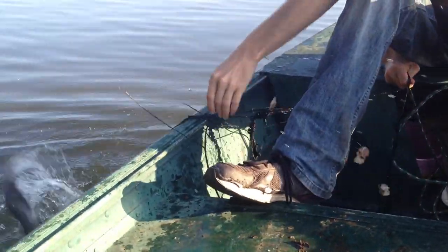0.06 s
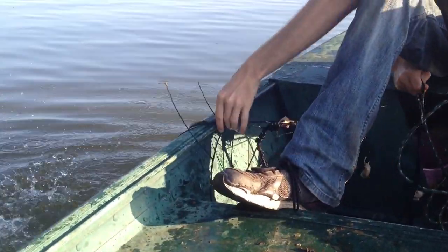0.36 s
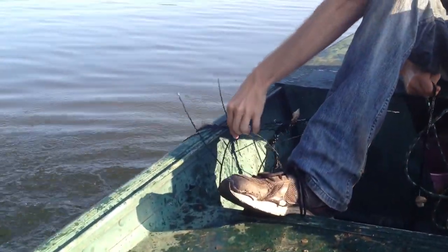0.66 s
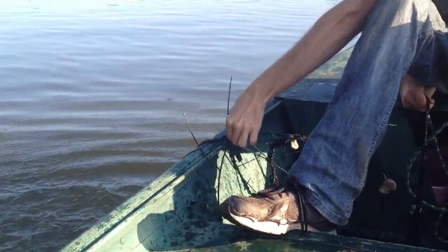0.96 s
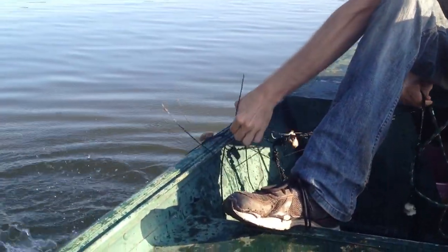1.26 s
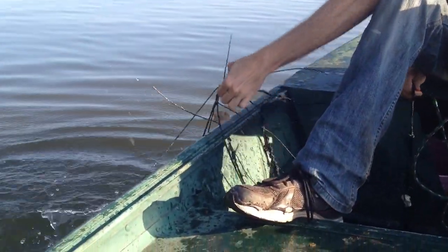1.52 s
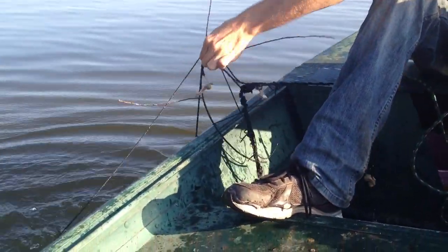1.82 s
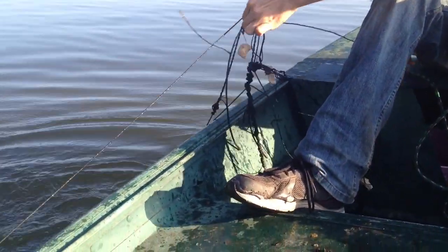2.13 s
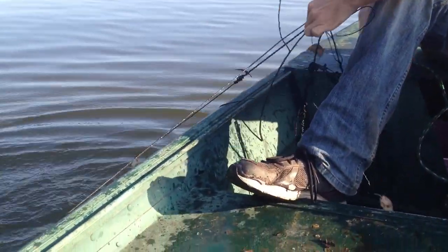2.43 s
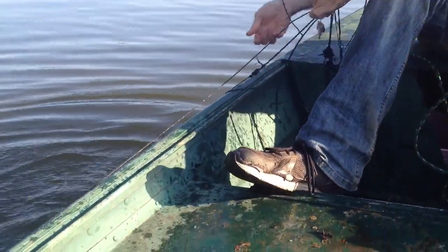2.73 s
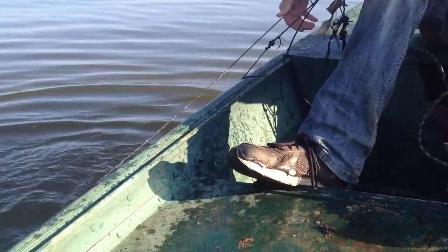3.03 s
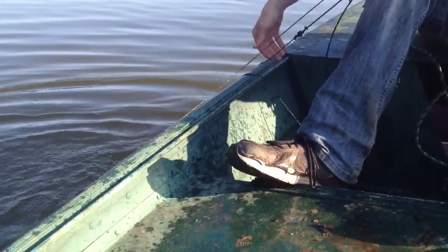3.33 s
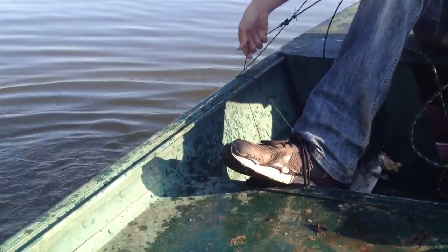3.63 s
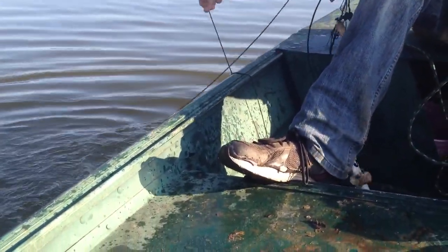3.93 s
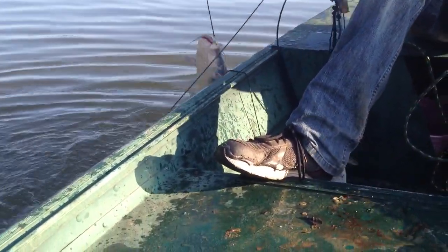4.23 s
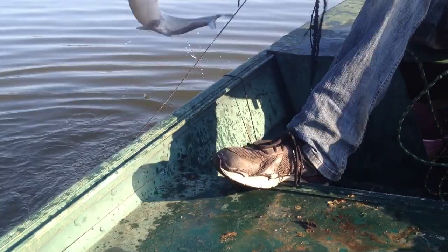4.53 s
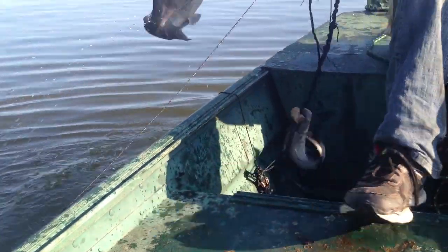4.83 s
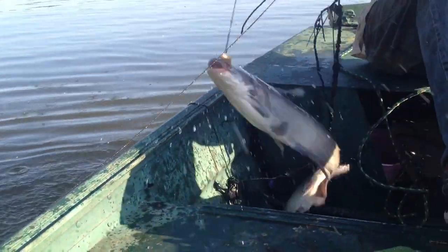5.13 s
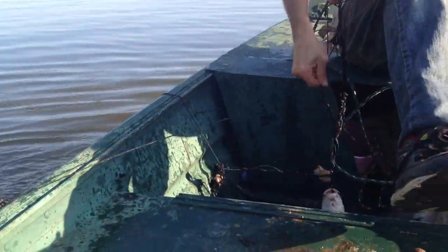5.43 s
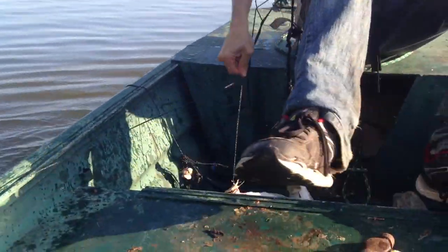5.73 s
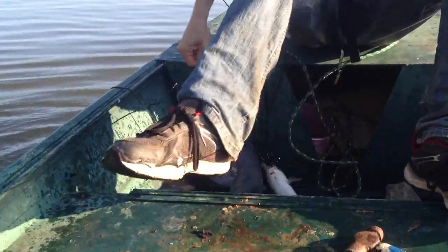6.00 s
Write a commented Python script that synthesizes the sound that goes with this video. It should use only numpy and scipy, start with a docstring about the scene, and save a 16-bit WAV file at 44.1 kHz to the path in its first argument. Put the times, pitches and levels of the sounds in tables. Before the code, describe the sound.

Light splashing and small ticks of fishing line, followed by wet fish knocking and flapping loudly on a metal boat floor.

```python
"""Catfish hauled into a metal boat

Fish on a hand line splash alongside, and the air they trap rings as bubbles. Wavelets drum on the hull,
line and tackle tick and slide on the gunwale, and something chirps far off. Aboard, the wet fish
slither and squeak by stick-slip friction, thump the floor plates into their damped modes
and land one sharp tail slap on the side wall."""
import sys
import numpy as np
from scipy import signal
from scipy.fft import rfft, irfft, next_fast_len
from scipy.io import wavfile
from scipy.ndimage import uniform_filter1d, map_coordinates

SR = 44100
rng = np.random.default_rng(int(sys.argv[2]) if len(sys.argv) > 2 else 0)


def transcribe(signal):
    """Save signal, clipped to [-1, 1], as a 16-bit WAV file at the path in sys.argv[1]."""
    frames = np.atleast_2d(signal).T
    limited = np.clip(frames, -1, 1)
    pcm = np.round(limited * 32767).astype(np.int16)
    wavfile.write(sys.argv[1], SR, pcm)


N = 276066
T = np.arange(N) / SR
LEAD_S, TOP_HZ = 0.1, 15800
AGE = np.arange(SR // 2) / SR - LEAD_S  # time around one event, s
ELAPSED = np.maximum(AGE, 0)


def amp(db):
    """Decibels to amplitude ratio."""
    return 10 ** (np.asarray(db) / 20)


def unit(x):
    """Normalisation to rms 1."""
    return x / np.sqrt(np.mean(x ** 2) + 1e-20)


def crest(x, size):
    """Normalisation of the loudest stretch of size samples to rms 1."""
    return x / np.sqrt(uniform_filter1d(x * x, size).max() + 1e-20)


def fade(t, t60):
    """Exponential decay from t = 0, silent before."""
    return (t >= 0) * np.exp(-np.log(1000) * np.abs(t) / t60)


def swell(rise, t60):
    """An envelope that builds up to time 0, then decays exponentially."""
    return np.where(AGE < 0, np.exp(-np.abs(AGE / (1.3 * rise)) ** 1.5), fade(AGE, t60))


def glide(hz):
    """A sine whose phase is the integral of a changing frequency."""
    return np.sin(2 * np.pi * np.cumsum(hz) / SR)


def colour(x, points):
    """Minimum-phase filter through (frequency_hz, gain_db) points."""
    size = 2 * next_fast_len(len(x) // 2 + 4096)
    hz, db = np.transpose(points)
    gain = amp(np.interp(np.log(np.fft.rfftfreq(size, 1 / SR) + 1), np.log(hz), db))
    cepstrum = irfft(np.log(gain))
    cepstrum[1:size // 2] *= 2
    cepstrum[size // 2 + 1:] = 0
    return irfft(rfft(x, size) * np.exp(rfft(cepstrum)))[:len(x)]


def resonate(x, hz, width_hz):
    """A second-order resonance with gain 1 at its centre."""
    return signal.lfilter(*signal.iirpeak(hz, hz / width_hz, fs=SR), x)


def wobble(rate_hz):
    """Smooth random modulation, interpolated between rate_hz knots a second."""
    return map_coordinates(rng.standard_normal(int(N * rate_hz / SR) + 4), [T * rate_hz])


def grit(spread_db, size):
    """Random amplitude modulation clumps one event's noise into grains of size samples."""
    clumps = unit(uniform_filter1d(rng.standard_normal(len(AGE)), size))
    return rng.standard_normal(len(AGE)) * amp(spread_db * clumps)


def add(track, start_s, sound):
    """Superposition of one event, its time 0 placed at start_s."""
    start = round((start_s - LEAD_S) * SR)
    part = sound[max(-start, 0):max(N - start, 0)]
    track[max(start, 0):][:len(part)] += part


# Lapping heard through the hull: frequency_hz, density_db
LAPPING_SPECTRUM = [(15, -79), (25, -53), (80, -20.5), (98, -15.5), (135, -13), (162, -3), (235, -11),
                    (283, -7.5), (329, -16), (376, -11), (510, -22.5), (803, -26), (874, -20.5),
                    (1140, -30), (1400, -57), (1820, -50), (3080, -120)]


def lapping(level_db=-43.5, fall_db_per_s=0.17):
    """Forced vibration: slowly calming wavelets keep the hull droning."""
    drumming = unit(colour(rng.standard_normal(N), LAPPING_SPECTRUM))
    hum = resonate(rng.standard_normal(N), 164, width_hz=22)
    hum = unit(resonate(hum, 179, width_hz=102))
    return amp(level_db - fall_db_per_s * T) * unit(drumming + amp(-1.5) * hum)


# Thin background hiss: frequency_hz, density_db
HISS_SPECTRUM = [(500, -43), (1300, 0.5), (2200, -6), (3700, -3), (4020, 0.5), (4300, -11.5), (6100, -7.5),
                 (7300, 3), (8000, -6.5), (8800, -24.5), (11000, -18.5), (15000, -11), (15700, -16)]


def hiss():
    """Stationary filtered noise lies faintly under everything."""
    return amp(-60) * unit(colour(rng.standard_normal(N), HISS_SPECTRUM))


def fizz(hz, log_spread, cycles, spread_db, count, size):
    """A bubble cloud: count randomly timed damped sines of size samples, each rising a little."""
    when, pitch, strength = rng.random((count, 3)).T[:, :, None]
    turns = hz * np.exp(log_spread * (2 * pitch - 1)) * np.arange(size) / SR
    lives = turns / cycles
    climb = 1 + 0.017 * np.minimum(lives, 2)
    gain = amp(-spread_db * np.log(strength + 0.0075))
    grains = gain * np.sin(2 * np.pi * turns * climb) * np.exp(-lives)
    positions = (when * N).astype(int) + np.arange(size)
    return unit(np.bincount(positions.ravel(), grains.ravel(), N)[:N])


# Filters for churned water and for flying droplets: frequency_hz, gain_db
SLOSH_FILTER = [(150, -44), (300, 6.5), (550, -2.5), (820, 8.5), (1100, 5.5), (1300, -4.5), (2200, -15)]
SPRAY_FILTER = [(800, -8.5), (1400, 2), (2200, -5.5), (3300, 1), (4500, -1), (6200, 1.5), (7600, -6),
                (9200, -16), (13000, -18), (15500, -29)]
# Tail strokes at the surface: start_s, slosh_db, spray_db, spray_t60_s
TAIL_STROKES = [(.01, -44.5, -41, 0.052), (0.069, -44, -42, 0.14), (.125, -46.5, -44, 0.18),
                (.212, -48, -44.5, 0.27), (.277, -51, -44.5, 0.24), (0.353, -36, -38, 0.26),
                (.44, -46, -47, 0.28), (.548, -49.5, -45.5, 0.047), (0.696, -52, -45, 0.34),
                (.825, -47, -46.5, 0.25), (1.055, -50.5, -52, 0.41), (1.185, -49.5, -50, 0.095),
                (1.235, -52, -58, 0.28), (1.281, -51, -47, 0.57), (1.43, -51, -54, 0.86),
                (1.56, -54.5, -50.5, 0.39), (1.711, -43, -53.5, 0.24), (2.804, -41.5, -52.5, 0.34),
                (2.86, -57, -56, 1), (3.072, -41.5, -53, 0.2), (3.155, -41.5, -49, 0.17),
                (3.221, -45.5, -56, 0.46)]


def splashes(wash_db=-54, wash_hold_s=0.13, wash_fall_db_per_s=8):
    """Incoherent sources add in power: each stroke churns big bubbles and throws spray; ripples trickle."""
    big_bubbles = fizz(775.6, log_spread=0.705, cycles=7.7, spread_db=1.1, count=2500, size=1200)
    slosh = unit(colour(big_bubbles + 0.041 * rng.standard_normal(N), SLOSH_FILTER))
    clumps = amp(2 * wobble(220))  # drops land in clumps
    spatter = unit(clumps * rng.standard_normal(N))
    droplets = fizz(3900, log_spread=0.85, cycles=5, spread_db=2, count=11000, size=256)
    bursts = fizz(4600, log_spread=0.5, cycles=1.2, spread_db=3, count=1100, size=96)
    spray = unit(colour(droplets + spatter + amp(-4) * bursts, SPRAY_FILTER))
    ripples = amp(-63 + 1.5 * wobble(4))
    trickle = ripples * fizz(2900, log_spread=0.45, cycles=6, spread_db=2, count=4000, size=512)
    # the churned patch fizzes on, then settles
    wash = amp(wash_db - wash_fall_db_per_s * np.maximum(T - wash_hold_s, 0))
    slosh_power, spray_power = (0.45 * wash) ** 2, wash ** 2
    for start_s, slosh_db, spray_db, t60 in TAIL_STROKES:
        add(slosh_power, start_s, (amp(slosh_db) * swell(0.021, 1.04 * t60)) ** 2)
        add(spray_power, start_s, (amp(spray_db) * swell(0.028, t60)) ** 2)
    return trickle + np.sqrt(slosh_power) * slosh + np.sqrt(spray_power) * spray


# Modes of the hull plates before a body damps them: pitch_hz, level_db, t60_s
PLATE_MODES = [(96, -38, 0.11), (147.4, 5.5, 0.34), (178, -6.5, 0.28), (239.2, -2.5, 0.43),
               (293.9, 3, 0.26), (338.6, -4, 1), (405.3, 4.5, 0.16), (500.8, -3.5, 0.24), (596, -3, 0.2),
               (732, 3, 0.12), (842.4, 3.5, 0.19), (936, 11, 0.036), (1046, -1, 0.25)]
# Their crowd of weak overtones: frequency_hz, density_db
OVERTONE_SPECTRUM = [(60, -28), (115, 5), (190, 0.5), (450, 2), (1120, -4), (1260, -7), (1800, -3.5),
                     (3000, 5.5), (8000, -100)]


def blow(level_db, rise, drag_t60, cutoff_hz, tap):
    """Contact force convolved with the plates' impulse response; harder contact wakes higher modes."""
    t = AGE[AGE >= 0]
    modes = np.zeros(len(t))
    for hz, mode_db, t60 in PLATE_MODES:
        envelope = amp(mode_db + rng.normal(0, 1)) * fade(t, t60)
        detuned_hz = hz * (1 + 0.0314 * rng.standard_normal())
        modes += envelope * np.sin(2 * np.pi * detuned_hz * t + rng.uniform(0, 2 * np.pi))
    damped = modes * fade(t, 1.0) * (1 - np.exp(-t / 0.00036))  # the wet body mutes the plate
    overtones = rng.standard_normal(len(t)) * (fade(t, 0.03) + amp(-12) * fade(t, 0.16))
    response = unit(damped) + unit(colour(overtones, OVERTONE_SPECTRUM))
    force = grit(2.7, size=128) * swell(rise, drag_t60)
    force *= min(rise + drag_t60 / 7, 0.04) * 70 / np.linalg.norm(force)  # long pushes outweigh the tap
    force[round(LEAD_S * SR)] += tap
    ring = signal.fftconvolve(force, response)[:len(AGE)]
    ring = signal.sosfilt(signal.butter(3, cutoff_hz, fs=SR, output="sos"), ring)
    lowest_hz = np.interp(level_db, [-20, -14], [140, 108])  # only heavy blows move the whole floor
    ring = signal.sosfilt(signal.butter(5, lowest_hz, "high", fs=SR, output="sos"), ring)
    return amp(level_db) * crest(ring, size=800)


# Swell and soft bodies meeting the hull: start_s, level_db, cutoff_hz
SOFT_BUMPS = [(0.079, -36.5, 440), (0.214, -34, 510), (0.634, -31.5, 173), (1.2, -37.5, 586),
              (1.227, -49, 450), (1.898, -35, 135), (2.847, -34.5, 480), (2.972, -38.5, 477),
              (3.271, -38, 139), (5.117, -30.5, 293), (5.49, -37.5, 463), (5.655, -40.5, 457),
              (5.98, -27, 426), (6.128, -24.5, 404), (6.234, -20, 430)]


def bumps():
    """Soft impact acts as a low-pass filter, so the plates answer dully."""
    out = np.zeros(N)
    for start_s, level_db, cutoff_hz in SOFT_BUMPS:
        early_s = 1.274 / cutoff_hz  # start early to offset the low-pass delay
        bump = blow(level_db, rise=0.012, drag_t60=0.069, cutoff_hz=cutoff_hz, tap=0.87)
        add(out, start_s - early_s, bump)
    return out


# Line and tackle striking metal: start_s, level_db, centre_hz, contact_t60_s, top_gain_db
TACKLE_TICKS = [(0.123, -47, 3600, 0.019, -20), (0.157, -40, 4340, 0.014, -20), (0.211, -46, 4800, .025, 0),
                (0.329, -26.5, 5270, 0.014, -14), (0.557, -39, 4070, 0.026, -22),
                (0.814, -36, 3430, 0.021, -14), (1.3543, -26.5, 3690, 0.019, -11),
                (2.496, -46.5, 4640, 0.05, -6), (2.874, -40, 2670, 0.051, -8),
                (3.3645, -34.5, 4150, 0.033, 2), (3.425, -43, 2570, 0.11, -41),
                (3.678, -42.5, 4970, 0.018, -6), (3.6866, -34.5, 6600, 0.0025, -15),
                (3.752, -40, 4030, 0.036, -7), (3.844, -47, 2250, 0.049, -25),
                (3.9216, -32.5, 6100, 0.02, -5), (4.952, -46, 3300, 0.021, 7),
                (5.159, -34.5, 4740, 0.06, -1), (5.379, -40, 3800, 0.028, 4),
                (5.672, -40, 6300, 0.018, -12), (5.728, -38, 4610, 0.036, -8),
                (5.7586, -27.5, 7510, 0.016, -13.5), (5.803, -34, 3250, 0.011, -10),
                (5.8207, -27, 6000, 0.026, -9.5)]
# The rim ringing under the firmer ticks: start_s, level_db
GUNWALE_RINGS = [(3.921, -41.5), (5.16, -42), (5.821, -29)]


def ticks(gunwale_hz=805, gunwale_t60_s=0.18):
    """Brief hard contacts excite high resonances: a snap, a short rattle, at times a ring of the rim."""
    out = np.zeros(N)
    for start_s, level_db, hz, t60, top_db in TACKLE_TICKS:
        snap = np.minimum(1.6 * swell(0.04 * t60, t60), 1)
        rattle = amp(-19) * fade(AGE, 0.075)
        contact = grit(2, size=32) * (snap + rattle)
        ring = resonate(contact, hz, width_hz=0.86 * hz) + 0.99 * resonate(contact, hz, width_hz=420)
        tick = colour(ring, [(300, 25), (1000, 11), (7500, 5), (9500, top_db + 1), (15000, top_db)])
        add(out, start_s, amp(level_db) * crest(tick, size=88))
    rim = fade(AGE, gunwale_t60_s) * np.sin(2 * np.pi * gunwale_hz * AGE)
    for start_s, level_db in GUNWALE_RINGS:
        add(out, start_s, amp(level_db) * rim)
    return out


# Single air bubbles in the water: start_s, level_db, pitch_hz, life_s
AIR_BUBBLES = [(0.192, -40, 3320, .004), (0.3122, -25, 4070, 0.0047), (0.337, -30, 1095, 0.026),
               (.675, -49, 5150, .02), (0.816, -40.5, 887, 0.012), (1.142, -45, 4450, .004),
               (1.521, -47.5, 1610, 0.01), (2.806, -34.5, 797, 0.008), (2.841, -30.5, 327.5, 0.017),
               (3.064, -31, 764, 0.012), (4.934, -17.5, 960, 0.0089)]


def bubbles(climb_per_life=0.101, gulp_at_s=0.96, gulp_db=-27):
    """Bubble resonance: trapped air rings, rising in pitch as it nears the surface; one pocket gulps."""
    out = np.zeros(N)
    for start_s, level_db, hz, life_s in AIR_BUBBLES:
        lives = ELAPSED / life_s
        attack = 1 - np.exp(-ELAPSED * hz)  # builds over about one cycle
        decay = np.exp(-lives ** 5) + 0.3 * fade(ELAPSED, 8 * life_s)
        tone = glide(hz * (1 + climb_per_life * np.minimum(lives, 2)))
        add(out, start_s, amp(level_db) * attack * decay * tone)
    add(out, gulp_at_s, amp(gulp_db) * gulp())
    return colour(out, [(70, -41), (200, -0.5)])


def gulp(from_hz=249.5, to_hz=870, length_s=0.15):
    """Resonance rises as volume falls: an air pocket shrinks ever faster and sings until it closes."""
    progress = ELAPSED / length_s
    pitch_hz = from_hz + (to_hz - from_hz) * progress ** 3
    envelope = (fade(AGE, 0.21) + amp(-13)) * np.exp(-progress ** 20)
    flutter = unit(uniform_filter1d(uniform_filter1d(rng.standard_normal(len(AGE)), 300), 200))
    breakup = amp(-6 * progress + 4.5 * np.minimum(progress, 1) * flutter)
    return glide(pitch_hz * (AGE > 0)) * envelope * breakup


# Short wet knocks on the plates: start_s, level_db, cutoff_hz, skid_db
WET_KNOCKS = [(0.968, -39, 1410, -65), (2.356, -42.5, 1250, -58), (3.423, -39, 1570, -59),
              (3.762, -36.5, 510, -53), (4.17, -44, 1770, -50.5), (5.105, -40.5, 980, -49),
              (5.16, -41.5, 1130, -47.5), (5.378, -35.5, 1480, -40.5), (5.527, -22.5, 1130, -36.5),
              (5.573, -25, 1100, -40), (5.605, -36.5, 1087, -49), (5.727, -35.5, 1300, -46.5),
              (5.759, -37.5, 516, -62), (5.783, -45, 950, -64), (5.902, -30, 1870, -49),
              (6.011, -29.5, 1100, -44.5)]


def knocks(skid_rise_s=0.002):
    """Impact, then friction: a quick blow rings the plates and wet skin skids on over them."""
    out = np.zeros(N)
    for start_s, level_db, cutoff_hz, skid_db in WET_KNOCKS:
        add(out, start_s, blow(level_db, rise=0.00052, drag_t60=0.018, cutoff_hz=cutoff_hz, tap=0.3))
        add(out, start_s + skid_rise_s, skid(skid_db, skid_rise_s, t60=0.25))
    return out


# Rubbing on the boat's surfaces: frequency_hz, density_db
FRICTION_SPECTRUM = [(350, -1), (700, 5.5), (1050, 9.5), (1350, -5), (1800, 3.5), (2900, 4), (4200, 1.5),
                     (6000, -1.5), (7600, -4), (9500, -19), (13000, -25), (15500, -38)]


def skid(level_db, rise, t60):
    """Friction noise: a sliding contact sheds a dense run of tiny slips."""
    slips = grit(2.5, size=60) * swell(rise, t60)
    return amp(level_db) * crest(colour(slips, FRICTION_SPECTRUM), size=500)


# Line, soles and wet skin sliding: start_s, level_db, rise_s, t60_s
SLIDING_CONTACTS = [(1.173, -41, 0.0039, 0.078), (1.823, -39.5, 0.014, 0.17), (1.875, -41.5, 0.0031, 0.082),
                    (2.354, -56, 0.0037, 0.051), (3.372, -41, 0.0051, 0.092), (3.928, -37.5, 0.0058, 0.061),
                    (4.046, -51.5, .01, 0.24), (4.785, -51, 0.037, 0.72), (4.87, -56, .03, 0.35),
                    (4.938, -43, 0.014, 0.11), (5.16, -48.5, 0.022, .1), (5.273, -48, 0.0082, 0.21),
                    (5.38, -37.5, 0.0081, 0.09), (5.518, -34, 0.0084, 0.16), (5.599, -32.5, 0.0043, .1),
                    (5.616, -34, 0.01, 0.13), (5.675, -40.5, 0.0018, 0.14), (5.69, -47, .003, 0.14),
                    (6.071, -34, 0.02, 0.37)]


def slides():
    """Sliding friction: the line runs over the gunwale, and soles and skin shift on the paint."""
    out = np.zeros(N)
    for start_s, level_db, rise, t60 in SLIDING_CONTACTS:
        add(out, start_s, skid(level_db, rise, t60))
    return out


def chirps(first_s=2.07, every_s=0.257, centre_hz=2940, climb_hz_per_s=15000, width_s=0.0085):
    """Linear frequency sweeps under a bell-shaped envelope: six faint whistles, perhaps a far bird."""
    out = np.zeros(N)
    note = np.exp(-(AGE / width_s) ** 2) * glide(centre_hz + climb_hz_per_s * AGE)
    for k in range(6):
        add(out, first_s + k * every_s, amp(-54 + rng.normal(0, 2.5)) * note)
    return out


# The whole floor giving under heavy blows: start_s, level_db, pitch_hz, t60_s
FLOOR_HEAVES = [(5.111, -15.5, 151, 0.17), (5.527, -15.5, 176.6, 0.12), (5.574, -15.5, 188, 0.078),
                (5.888, -16, 170, 0.1), (6.149, -4, 136, 0.06), (6.221, -8, 146, 0.12)]


def heaves(rise_s=0.0036):
    """A damped mass and spring: the floor sags under the weight and swings for a few deep cycles."""
    out = np.zeros(N)
    attack = 1 - np.exp(-ELAPSED / rise_s)
    for start_s, level_db, hz, t60 in FLOOR_HEAVES:
        swing = fade(ELAPSED, t60) * np.sin(2 * np.pi * hz * ELAPSED)
        add(out, start_s, amp(level_db) * attack * swing)
    return colour(out, [(40, -14), (110, 0)])


# A whole fish falling flat and dragging: start_s, level_db, cutoff_hz, rise_s, drag_t60_s, skid_db
BODY_FLOPS = [(5.837, -35, 1740, 0.021, 0.38, -34.5), (5.92, -21.3, 1030, 0.029, 0.08, -65),
              (6.045, -27, 900, 0.026, .3, -39.5), (6.083, -12, 810, 0.011, 0.12, -46),
              (6.177, -20, 856, 0.0041, 0.052, -41), (6.202, -14, 970, 0.0068, 0.15, -35.5)]


def flops(floor_hz=412):
    """Distributed impact: three contacts blur into one thud, the floor plate booms and the skin skids."""
    out = np.zeros(N)
    for start_s, level_db, cutoff_hz, rise, drag_t60, skid_db in BODY_FLOPS:
        contacts = sum(blow(0, rise, drag_t60, cutoff_hz, tap=0) for _ in range(3))
        thud = amp(level_db) * crest(contacts, size=800)
        boom = amp(-3) * resonate(thud, floor_hz, width_hz=110)
        add(out, start_s, thud + boom + skid(skid_db, rise=0.016, t60=0.26))
    return out


# Partials of a squeak: pitch_hz, level_db, t60_s
SQUEAK_PARTIALS = [(1770, 19.5, 0.037), (2410, 11.5, 0.051), (2970, 3.5, 0.087)]
# Squeaks on the wet paint: start_s, level_db
WET_SQUEAKS = [(5.855, -25), (6.077, -20.5)]


def squeaks():
    """Stick-slip oscillation: something wet catches and lets go, singing for an instant."""
    out = np.zeros(N)
    for start_s, level_db in WET_SQUEAKS:
        tone = np.zeros(len(AGE))
        for hz, partial_db, t60 in SQUEAK_PARTIALS:
            phase_drift = 0.061 * np.cumsum(rng.standard_normal(len(AGE)))
            tone += amp(partial_db) * swell(0.00089, t60) * np.sin(2 * np.pi * hz * AGE + phase_drift)
        add(out, start_s, amp(level_db) * crest(tone, size=300))
    return out


# Resonances of the side wall: centre_hz, width_hz, gain_db
WALL_MODES = [(1740, 260, -0.5), (2600, 300, 6.5), (3140, 260, 0.5), (3340, 190, 6), (3620, 190, 13.5),
              (4380, 510, 13), (5000, 370, 7), (5500, 400, -9), (6500, 820, -6)]
# The tail striking that wall: start_s, level_db, contact_t60_s
TAIL_SLAP = [(6.1764, -6.5, 0.035)]


def slap(crackle_db=-15.5, crackle_gap_s=0.0021, crackle_t60_s=0.003):
    """Broadband excitation: one sharp slap rings the wall brightly, with a brief crackle at its start."""
    out = np.zeros(N)
    ring_filter = [(500, -29), (1300, -23), (1650, 8.5), (6000, 1.5), (10000, -15), (15000, -24)]
    crackle_filter = [(1200, -20), (4000, 17), (6000, 18), (8500, -5), (15000, -12)]
    for start_s, level_db, t60 in TAIL_SLAP:
        press = np.minimum(2 * fade(AGE, t60), 1)  # full force for a moment, then release
        contact = grit(0.44, size=32) * (press + amp(-26.5) * fade(AGE, 0.19))
        ring = sum(amp(gain_db) * resonate(contact, hz, width) for hz, width, gain_db in WALL_MODES)
        add(out, start_s, amp(level_db) * crest(colour(ring, ring_filter), size=180))
        for k in range(3):  # tiny noise bursts that sound like overload
            burst = colour(rng.standard_normal(len(AGE)) * fade(AGE, crackle_t60_s), crackle_filter)
            add(out, start_s + 0.00055 + k * crackle_gap_s, amp(crackle_db) * crest(burst, size=44))
    return out


def scene():
    """Superposition in open air: all sources sum to one channel without reverberation."""
    ambience = lapping() + hiss() + chirps()
    water = splashes() + bubbles()
    thuds = bumps() + knocks() + flops() + heaves()
    return (ambience + water + thuds + ticks() + slides() + slap() + squeaks())[None]


def record(dry):
    """Hard clipping at full scale, then a band limit at TOP_HZ."""
    size = next_fast_len(N + SR // 2)
    passband = np.fft.rfftfreq(size, 1 / SR) < TOP_HZ
    return irfft(rfft(np.clip(dry, -1, 1), size) * passband, size)[..., :N]


dry = scene()
out = record(dry)
transcribe(out)
```